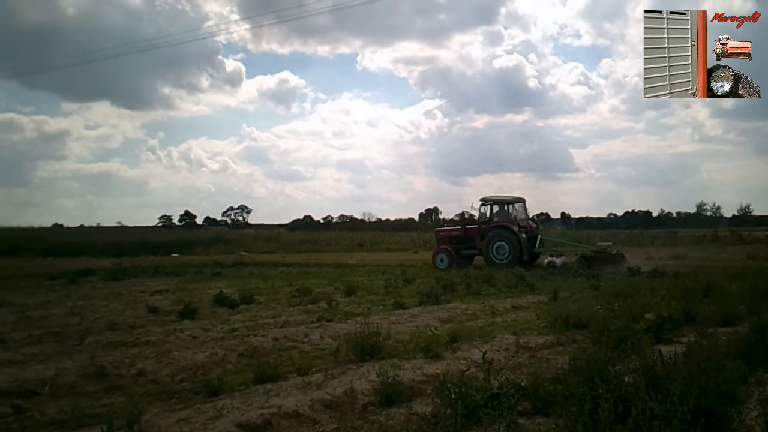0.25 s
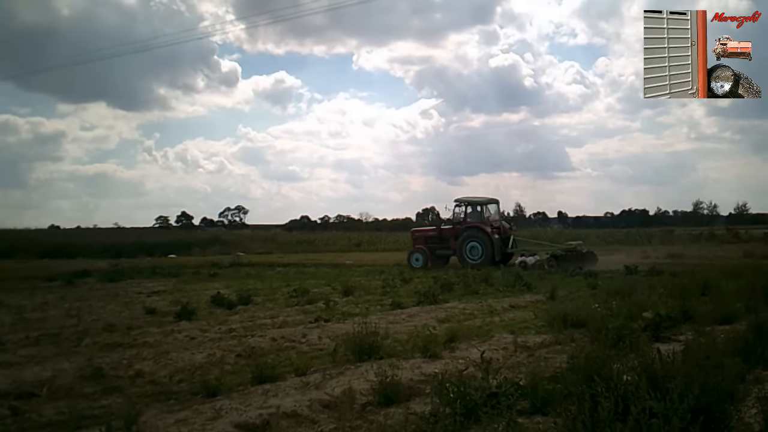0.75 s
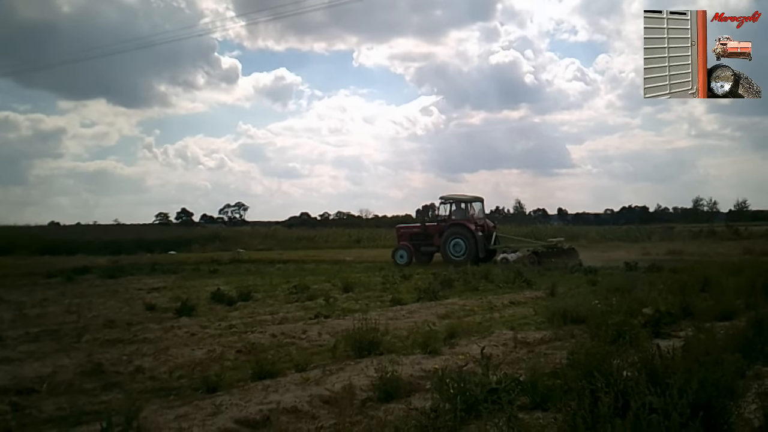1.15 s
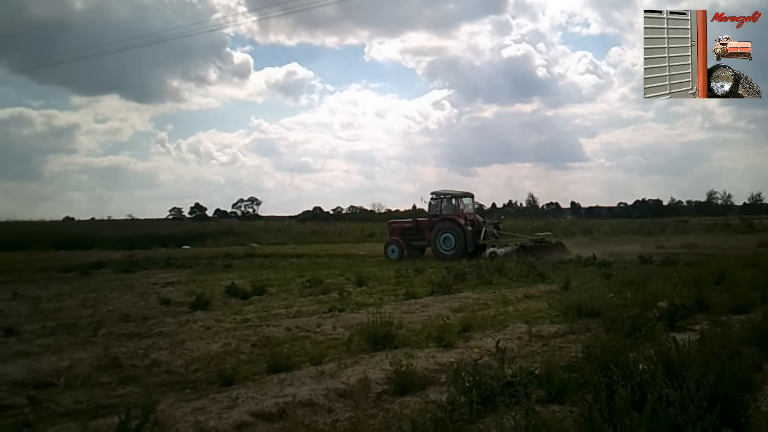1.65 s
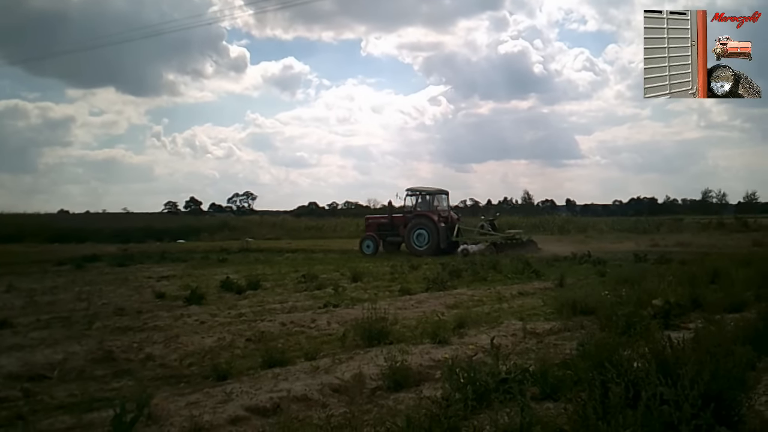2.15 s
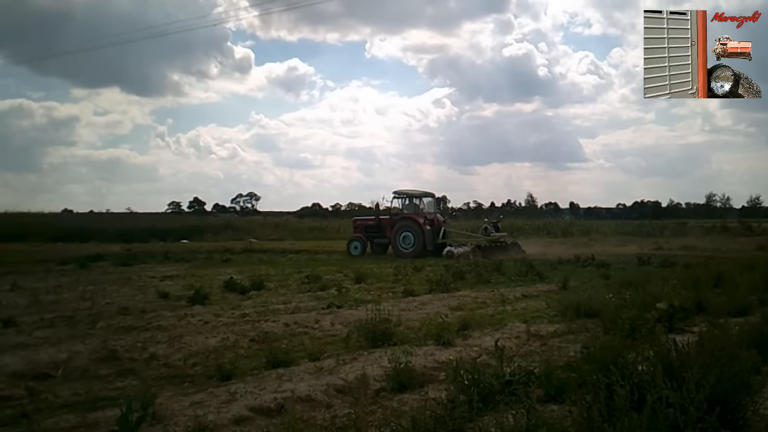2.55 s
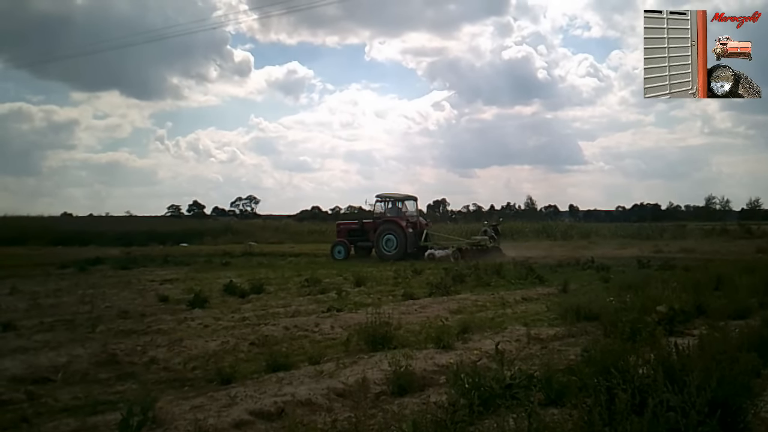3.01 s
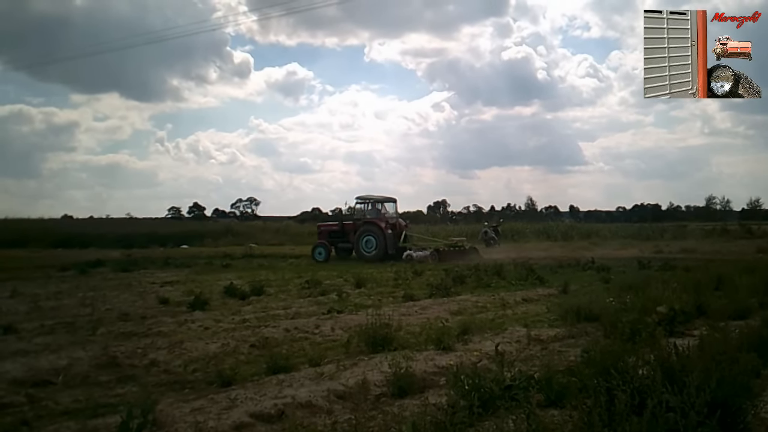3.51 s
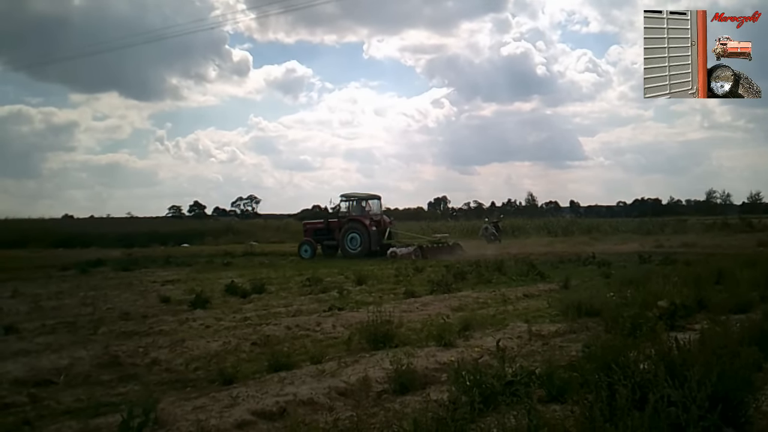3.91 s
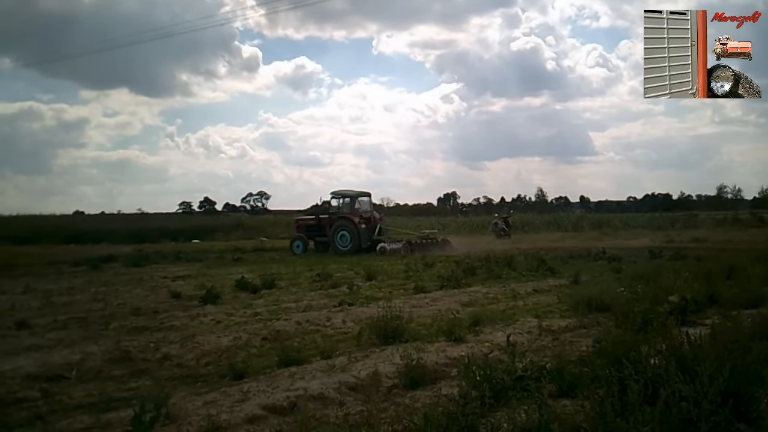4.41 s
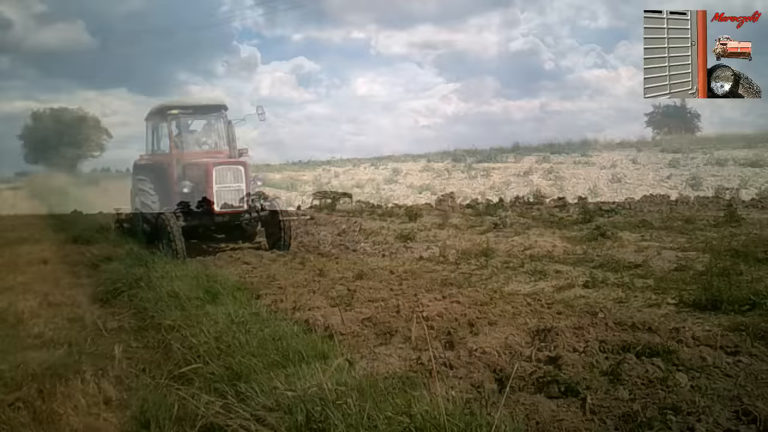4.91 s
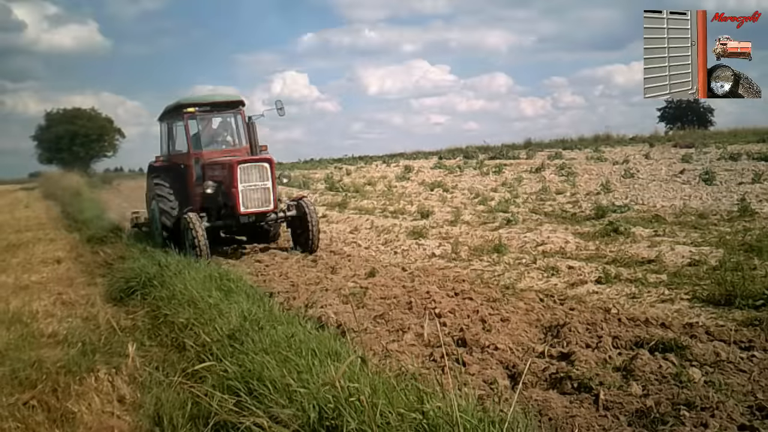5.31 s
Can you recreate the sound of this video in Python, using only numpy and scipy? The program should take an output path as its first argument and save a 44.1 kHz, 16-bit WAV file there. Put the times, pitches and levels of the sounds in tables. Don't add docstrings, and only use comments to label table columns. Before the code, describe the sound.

A steady diesel tractor drone works under load, bassy exhaust puffs mixed with intake gulps, hood thumps, clattering knock and faint high hiss. Misfires make it stumble early and midway. The discs grind earth as a dull rumble. Near 4.4 seconds the view jumps closer: faster, louder, rougher and flat-clipped exhaust, with the first engine fading under it. Dry open air, cheap mono microphone.

```python
import sys
import numpy as np
from scipy import signal
from scipy.fft import rfft, irfft, next_fast_len
from scipy.io import wavfile
from scipy.ndimage import map_coordinates

SR = 44100
rng = np.random.default_rng(int(sys.argv[2]) if len(sys.argv) > 2 else 0)


def pcm_store(signal):
    levels = np.round(np.clip(np.atleast_2d(signal), -1, 1) * 32767)
    wavfile.write(sys.argv[1], SR, levels.astype(np.int16).T)


def amplitude_ratio(level_db):
    exponent = np.asarray(level_db, float) / 20
    return 10 ** exponent


N = 245195
t = np.arange(N) / SR
# (exhaust [dB], intake [dB], blow on the hood [dB])
CYLINDERS = [(1.1, -2.4, -10), (-.7, 1.6, -3.5), (1.2, 1.1, -12), (-.5, -2, .1)]
KNOCK_GROWS = .9


def curves(rows):
    s, *columns = np.transpose(rows)
    return [np.interp(t, s, column) for column in columns]


def unit(x):
    return x / np.sqrt(np.mean(x ** 2) + 1e-20)


def filtered(x, response):
    m = next_fast_len(N + SR // 2)
    return irfft(rfft(x, m) * response(np.fft.rfftfreq(m, 1 / SR)), m)[:N]


def shape(points):
    hz, db = np.transpose(points)
    return lambda f: amplitude_ratio(np.interp(np.log(f + 1), np.log(hz + 1), db))


def mode(f, hz, width):
    return 1j * f * width / (hz * hz - f * f + 1j * f * width)


def modes(rows):
    return lambda f: sum((-1) ** k * amplitude_ratio(db) * mode(f, hz, w) for k, (hz, w, db) in enumerate(rows))


def wobble(rate):
    knots = rng.standard_normal(int(N * rate / SR) + 4)
    return map_coordinates(knots, [t * rate])


def pulses(at, strengths, delay_s=0):
    return np.bincount(at + int(delay_s * SR), strengths, N + SR)[:N]


def firings(speed, misses):
    turns = np.cumsum(curves(speed)[0]) / SR
    miss_s, share = np.transpose(misses)
    at_miss = np.interp(miss_s, t, turns - np.interp(miss_s[0], t, turns))
    cycles = 4 * np.round(at_miss / 4)
    turns += np.interp(t, miss_s, cycles - np.interp(miss_s, t, turns))
    at = np.flatnonzero(np.diff(np.floor(turns)))
    count = np.round(turns[at]).astype(int)
    burnt = np.ones(len(at))
    burnt[np.searchsorted(count, cycles)] = np.clip(share, 0, 1)
    return at, count % len(CYLINDERS), burnt


def sizes(cylinder, scatter_db, axis):
    habit_db = np.transpose(CYLINDERS)[axis][cylinder]
    return amplitude_ratio(habit_db + scatter_db * rng.standard_normal(len(cylinder)))


def whine():
    # (frequency [Hz], level [dB rms])
    tones = [(7794, -88), (7853, -85), (7912, -75), (7971, -82), (8029.5, -81), (8088, -78), (8147, -89),
             (8206, -91)]
    return sum(amplitude_ratio(db + 3) * np.sin(2 * np.pi * hz * t) for hz, db in tones)


def soil(lumpy_db):
    # (frequency [Hz], density [dB per Hz])
    ground = [(8, -4), (30, 3.5), (70, -1.5), (150, -1), (250, -2.5), (400, -14.5), (600, -69.5)]
    grinding = amplitude_ratio(lumpy_db * wobble(9)) * rng.standard_normal(N)
    return unit(filtered(grinding, shape(ground)))


def hiss(at, depth_db):
    # (frequency [Hz], density [dB per Hz])
    spectrum = [(4300, -41), (4700, -14), (5100, -12.5), (6100, 1), (7000, -7), (8000, -8.5), (9200, -24),
                (10000, -32), (11500, -89)]
    tail = amplitude_ratio(-60 * t[:SR // 20] / 0.035)
    blows = pulses(at, amplitude_ratio(depth_db + 4 * rng.standard_normal(len(at))))
    swell = signal.fftconvolve(blows, tail)[:N]
    return unit(filtered((1 + swell) * rng.standard_normal(N), shape(spectrum)))


def hood(at, strengths):
    # (frequency [Hz], width [Hz])
    sheet = [(288, 32), (280, 18)]
    blows = pulses(at, strengths, delay_s=.012)
    return unit(filtered(blows, lambda f: mode(f, *sheet[0]) * mode(f, *sheet[1])))


def panel_rattle(at, panels, shared_db, depth_db, t60, own_db):
    borders = [190, 1000, 1730, 2900, 4700]
    shake = [-7.5, -1, -2.5, 2.5]
    tail = amplitude_ratio(-60 * t[:SR // 20] / t60)
    rattle = 0
    for lo, hi, db in zip(borders, borders[1:], shake):
        size = amplitude_ratio(depth_db + db + shared_db + own_db * rng.standard_normal((2, len(at))))
        combustion = pulses(at, size[0], delay_s=.002)
        valves = pulses(at, 0.57 * size[1], delay_s=.006)
        swell = signal.fftconvolve(combustion + valves, tail)[:N]
        bursts = unit(1 + swell) * amplitude_ratio(0.63 * wobble(12)) * rng.standard_normal(N)
        rattle = rattle + filtered(bursts, lambda f: shape(panels)(f) * (f >= lo) * (f < hi))
    return unit(rattle)


def block_ping(at, shared_db, own_db):
    # (frequency [Hz], width [Hz], level [dB])
    block = [(701, 110, -3.5), (1379, 107, 2), (2063, 140, -4), (2496, 150, -6), (3350, 200, -17.5)]
    ping = 0
    for hz, width, db in block:
        late = at + rng.integers(SR // 500, SR // 200, len(at))
        size = amplitude_ratio(db + shared_db + own_db * rng.standard_normal(len(at)))
        ping = ping + filtered(pulses(late, size), lambda f: mode(f, hz, 2 * width) ** 3)
    return unit(ping)


def knock(at, panels, depth_db, t60, scatter_db, own_db, ping_db):
    shared_db = scatter_db * rng.standard_normal(len(at))
    rattle = panel_rattle(at, panels, shared_db, depth_db, t60, own_db)
    return rattle + amplitude_ratio(ping_db) * block_ping(at, shared_db, own_db)


def intake(at, cylinder, burnt):
    # (frequency [Hz], width [Hz], level [dB])
    air_cleaner = [(40, 17, 37.5), (101, 15, 38.3), (160, 74, 28)]
    suction = 1 - .3 * np.roll(1 - burnt, 1)
    gulps = suction * sizes(cylinder, scatter_db=1, axis=1)
    return filtered(pulses(at, gulps, delay_s=.0044), modes(air_cleaner))


def exhaust(at, strengths, burnt, cold_share):
    # (frequency [Hz], width [Hz])
    silencer = [(33.4, 38), (67, 30)]
    # (frequency [Hz], width [Hz], level re silencer [dB])
    tailpipe = [(100, 18.5, -10.4)]
    first, second = silencer
    pipe = lambda f: mode(f, *first) * mode(f, *second) - modes(tailpipe)(f)
    unburnt = pulses(at, cold_share * (1 - burnt), delay_s=.006)
    cold = filtered(unburnt, lambda f: pipe(1.02 * f))
    return filtered(pulses(at, strengths * burnt), pipe) + cold


def soft(x):
    return filtered(x, lambda f: 1 / (1 + (f / 225) ** 8))


def far_view():
    # (time [s], rate [firings per s])
    speed = [(0, 43.6), (.67, 43.4), (1.13, 44.3), (1.6, 45.5), (2.24, 44.5), (2.79, 44.4), (3.4, 43.7),
             (3.95, 42.7), (4.43, 42.3)]
    # (time [s], share of the charge that still burns [1])
    misses = [(.197, .2), (.291, .15), (.384, .02), (1.665, .25), (1.754, .02), (2.024, .02), (2.295, .02),
              (2.662, .02), (3.486, .6), (3.578, .2), (3.671, .1), (3.944, .4), (4.322, .15)]
    # (time [s], load [dB])
    load = [(0, 2), (.6, -0.5), (1.2, 1), (1.8, 0), (2.4, 1), (3, -1), (3.6, -0.93), (4.4, -2)]
    # (frequency [Hz], density [dB per Hz])
    panels = [(200, 5), (340, 1.5), (467, -4), (720, -2.5), (1050, -12), (1370, -3.5), (1730, -18),
              (2080, -9.5), (2520, -11.5), (2770, -18.5), (3390, -20.5), (3800, -28.5), (4250, -31),
              (4700, -54.5)]
    at, cylinder, burnt = firings(speed, misses)
    load_db, = curves(load)
    gulps = intake(at, cylinder, burnt)
    puffs = amplitude_ratio(47) * exhaust(at, sizes(cylinder, scatter_db=1.2, axis=0), burnt, cold_share=.55)
    gas = amplitude_ratio(load_db) * soft(puffs + gulps)
    engine = knock(at, panels, depth_db=1, t60=0.037, scatter_db=1.6, own_db=2.6, ping_db=-9)
    engine = engine + amplitude_ratio(-32.0) * hiss(at, depth_db=4.0)
    engine = amplitude_ratio(-33 + KNOCK_GROWS * load_db) * engine
    thumps = amplitude_ratio(-30.5 + 2.2 * load_db) * hood(at, sizes(cylinder, scatter_db=1.7, axis=2))
    rumble = amplitude_ratio(-28) * soil(lumpy_db=1.5)
    return gas + engine + thumps + rumble + whine()


def near_view():
    # (time [s], rate [firings per s])
    speed = [(4.44, 47.05), (4.8, 47.8), (5.2, 47.7), (5.56, 47.2)]
    # (time [s], share of the charge that still burns [1])
    misses = [(5.068, 0.013)]
    # (time [s], load [dB])
    load = [(4.45, -0.1), (5.2, -0.74), (5.56, 2)]
    # (frequency [Hz], density [dB per Hz])
    panels = [(200, -6.5), (340, 3.5), (476, -10), (606, 2), (756, 1.5), (943, -16.5), (1040, -5.5),
              (1310, -13.5), (1500, -3), (1750, -19.5), (2140, -8.5), (3430, -20), (3640, -29), (4700, -42)]
    at, cylinder, burnt = firings(speed, misses)
    load_db, = curves(load)
    puffs = exhaust(at, sizes(cylinder, scatter_db=.5, axis=0), burnt, cold_share=.3)
    gas = amplitude_ratio(load_db + 55.5) * soft(puffs)
    engine = knock(at, panels, depth_db=-0.2, t60=0.039, scatter_db=2.5, own_db=2.5, ping_db=-10.5)
    engine = engine + amplitude_ratio(-34.5) * hiss(at, depth_db=0.5)
    engine = amplitude_ratio(-25 + KNOCK_GROWS * load_db) * engine
    rumble = amplitude_ratio(-24.5) * soil(lumpy_db=1.0)
    return gas + engine + rumble + amplitude_ratio(-3) * whine()


def scene():
    cut_s, fade_s, edge_s = 4.4415, 1, 0.0007
    fade = np.clip(1 - (t - cut_s) / fade_s, 0, 1)
    cut = np.clip((t - cut_s) / edge_s, 0, 1)
    return (fade * far_view() + cut * near_view())[None]


def band_limit(x):
    return signal.sosfilt(signal.butter(12, 15800, fs=SR, output="sos"), x)


def record(dry):
    top = lambda f: 1 / (1 + (f / 9600) ** 16)
    clipped = np.clip(filtered(dry[0], top), -.983, .983)
    dulled = filtered(clipped, lambda f: .5 + .5 * top(f))
    return band_limit(dulled[None])


dry = scene()
out = record(dry)
pcm_store(out)
```